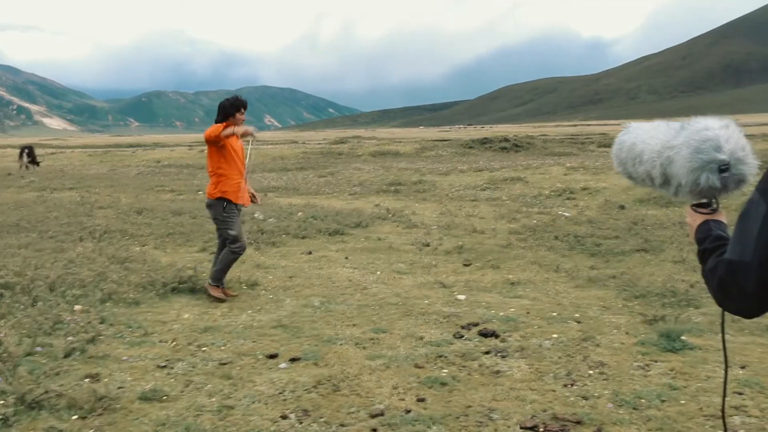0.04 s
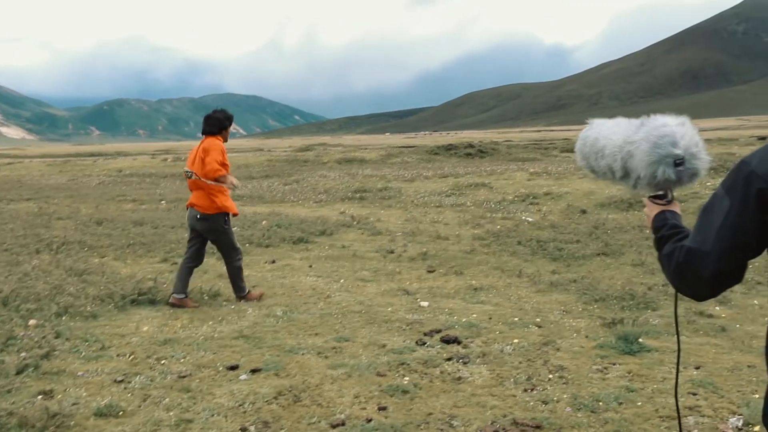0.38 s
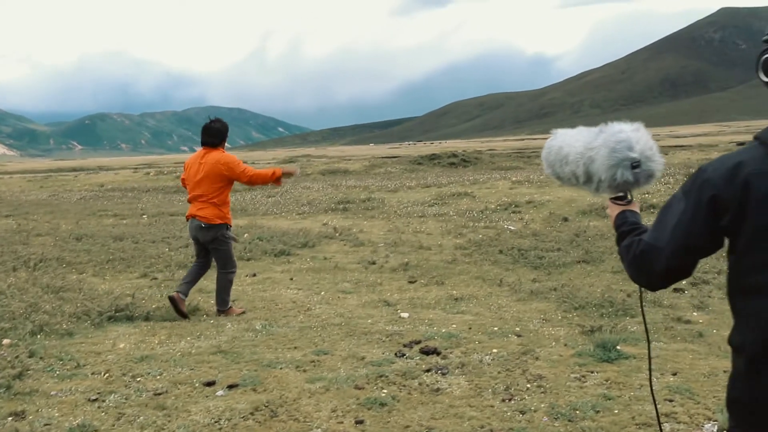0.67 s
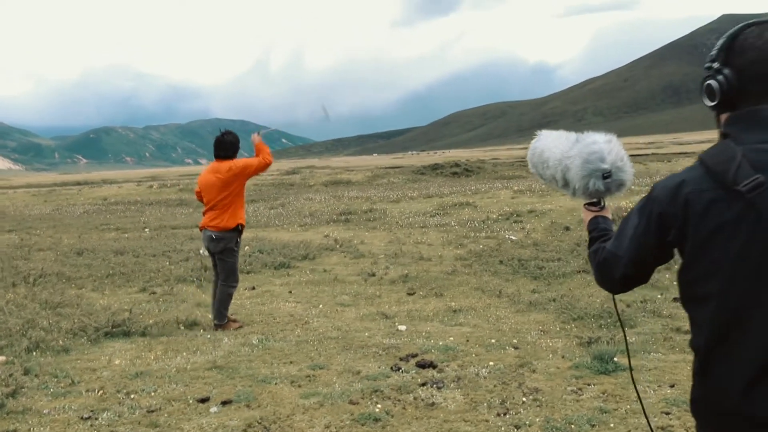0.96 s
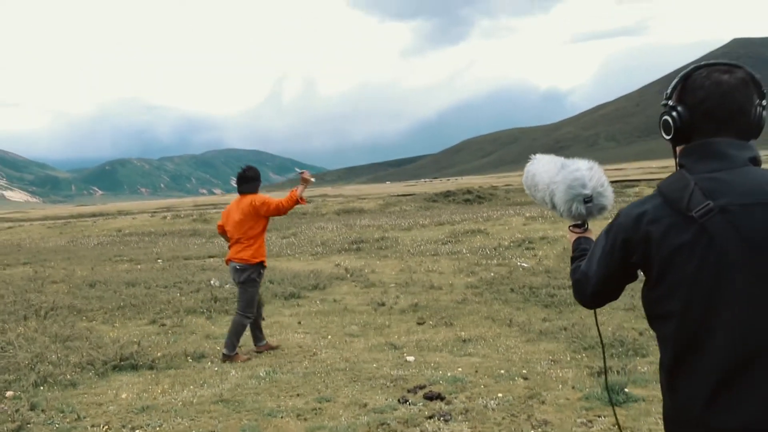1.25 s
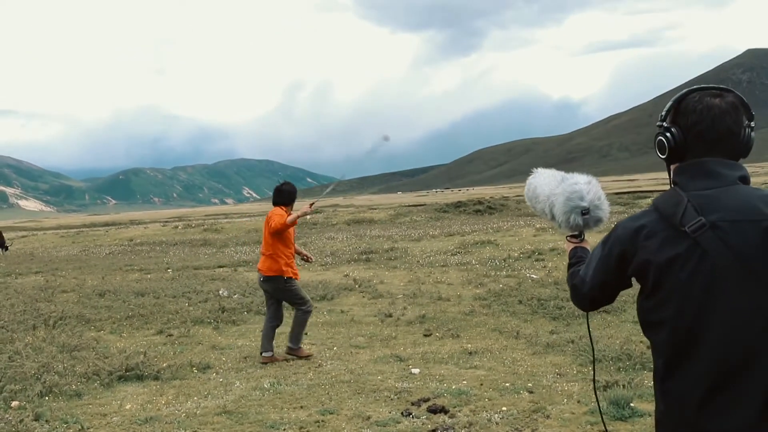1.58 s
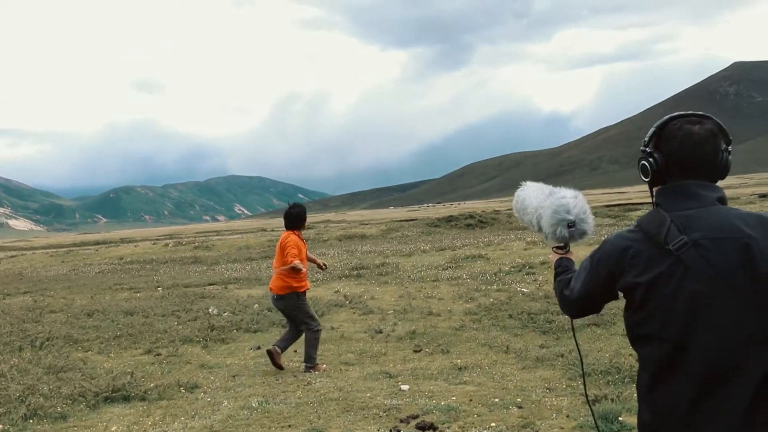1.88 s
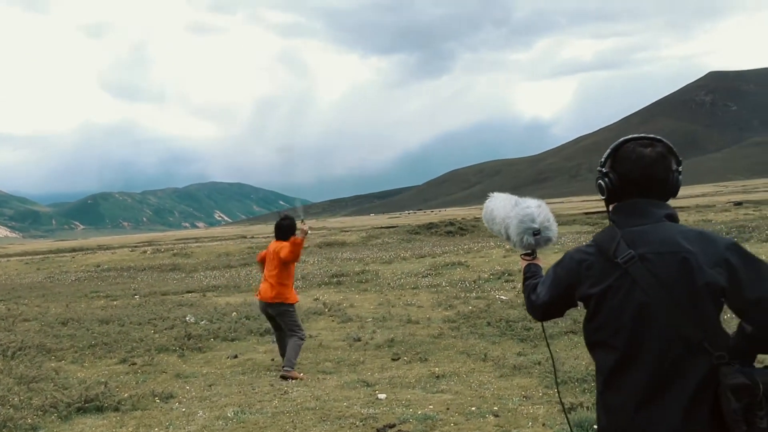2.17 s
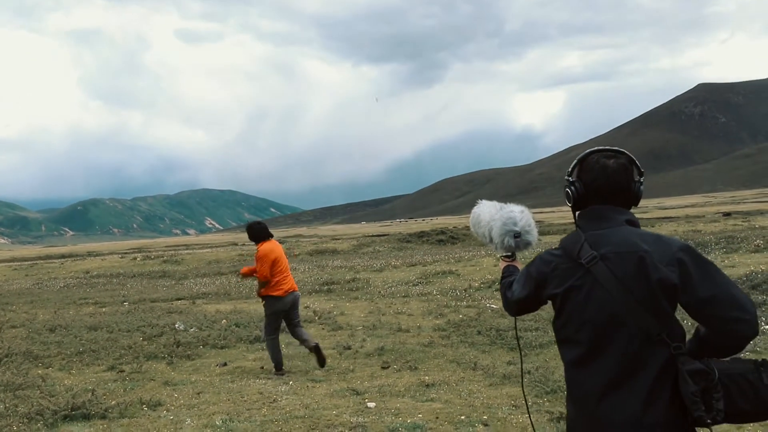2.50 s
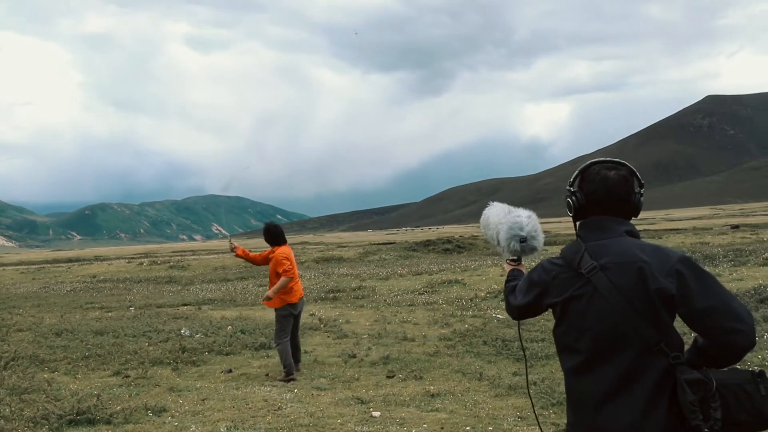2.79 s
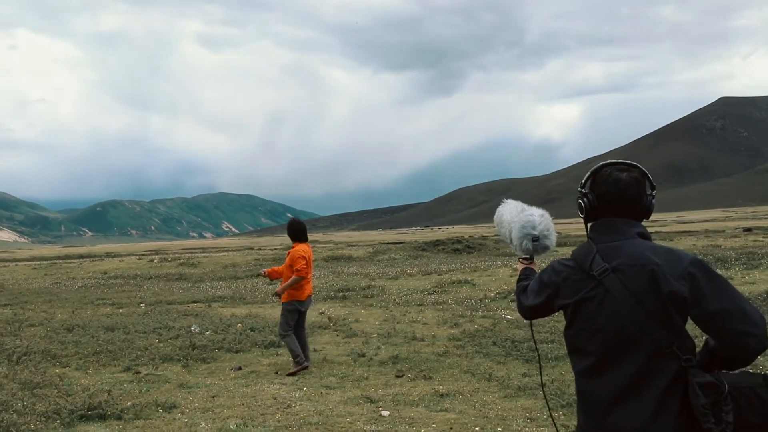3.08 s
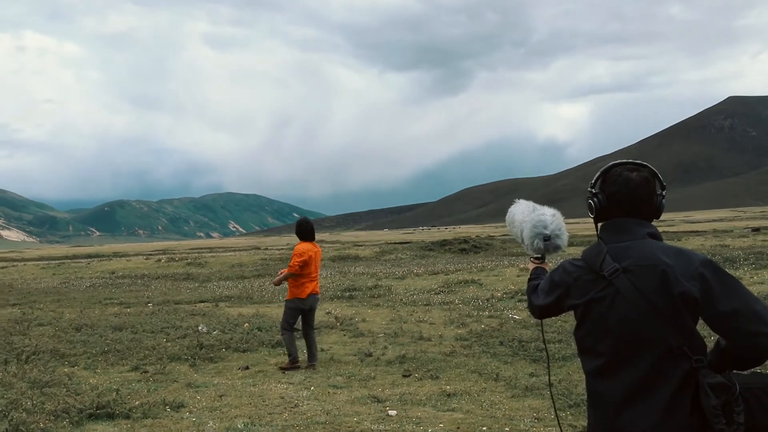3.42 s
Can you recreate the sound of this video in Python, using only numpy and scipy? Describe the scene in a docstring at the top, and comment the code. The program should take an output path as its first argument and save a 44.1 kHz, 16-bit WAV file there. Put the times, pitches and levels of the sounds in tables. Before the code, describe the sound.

A sling whooshes and cracks sharply like a whip, in light outdoor wind.

```python
"""A sling on a grassy plain

A sling is whirled and let fly in light wind; feet and jacket are faintly heard. The cord sheds
vortices and whistles higher as it speeds up. Its tip cracks with a short pressure pulse, and it
flails and slaps as it slows. The ground reflects the crack, the land scatters it, and the spinning
stone whirrs away, fading with distance."""
import sys
import numpy as np
from scipy import signal
from scipy.fft import rfft, irfft
from scipy.io import wavfile
from scipy.ndimage import uniform_filter1d

SR = 44100
rng = np.random.default_rng(int(sys.argv[2]) if len(sys.argv) > 2 else 0)


def materialize(psi):
    """Save the field psi as 16-bit PCM at rate SR to the path in sys.argv[1].

    A 1-D psi becomes a single channel; in a 2-D psi each row is a channel.
    """
    bounded = np.clip(np.atleast_2d(psi).T, -1, 1)
    quanta = np.round(bounded * 32767).astype(np.int16)
    wavfile.write(sys.argv[1], SR, quanta)


N = 160965
T = np.arange(N) / SR


def from_db(db):
    """Amplitude grows tenfold for every 20 dB."""
    return 10 ** (np.asarray(db) / 20)


def unit_rms(x):
    """Division by the RMS amplitude gives unit power."""
    return x / np.sqrt(np.mean(x ** 2) + 1e-20)


def lowpass(x, hz, order=1):
    """A causal Butterworth filter attenuates what lies above its cutoff."""
    return signal.sosfilt(signal.butter(order, min(hz, .45 * SR), fs=SR, output="sos"), x + 1e-18)


def noise(spectrum):
    """Spectral shaping colours white noise; the result has unit power."""
    hz, db = np.transpose(spectrum)
    bin_hz = np.maximum(np.arange(N // 2 + 1) * SR / N, 1)
    gain = from_db(np.interp(np.log(bin_hz), np.log(hz), db))
    return unit_rms(irfft(rfft(rng.standard_normal(N)) * gain, N))


def drift(hz):
    """Low-passed noise gives a random fluctuation of unit power."""
    return unit_rms(lowpass(rng.standard_normal(N + SR), hz, order=2)[SR:])


def swell(centre_s, half_s):
    """A Gaussian envelope falls to 1/e at half_s either side of its centre."""
    return np.exp(-((T - centre_s) / half_s) ** 2)


def decay(start_s, t60):
    """Exponential decay: a sudden onset loses 60 dB in t60 seconds."""
    return (T >= start_s) * np.exp(-np.log(1000) * np.clip((T - start_s) / t60, 0, 10))


def ping(start_s, hz, t60):
    """A struck mode vibrates as a damped sine."""
    return decay(start_s, t60) * np.sin(2 * np.pi * hz * (T - start_s))


def with_ground_echo(direct, db, lag_s=.00222):
    """Ground reflection adds a later, duller copy to the direct sound."""
    return direct + from_db(db) * lowpass(np.interp(T - lag_s, T, direct), hz=3400)


# Strength of the buffeting. Each row: time in seconds, level in dB.
BUFFET_LEVELS = [(0.0, -68), (0.04, -32), (0.35, -33), (0.47, -32), (0.7, -20.5), (1.05, -29), (1.75, -30),
                 (1.92, -21), (2.1, -29), (2.6, -27), (3.0, -33), (3.09, -24), (3.33, -35), (3.65, -33)]
# Spectra of the buffeting and the rush of air. Each row: frequency in Hz, relative density in dB.
BUFFET_SPECTRUM = [(3, -29.5), (8, -5), (11, -1), (17, -11), (29, -23), (40, -24), (50, -36), (80, -51),
                   (200, -70.5), (1000, -110)]
AIR_SPECTRUM = [(40, 1), (130, 2.5), (230, -7), (500, -5), (1000, -12.5), (2000, -20.5), (4000, -26.5),
                (8000, -31.5), (15000, -34.5)]

def wind(air_db=-61, flutter_db=.78):
    """Turbulent pressure buffets the microphone under the soft rush of air over the plain."""
    buffet = noise(BUFFET_SPECTRUM)
    buffet /= np.sqrt(uniform_filter1d(buffet ** 2, size=SR // 5))  # even out the power over 0.2 s
    buffet *= from_db(np.interp(T, *np.transpose(BUFFET_LEVELS)))
    return buffet + from_db(air_db + flutter_db * drift(3.7)) * noise(AIR_SPECTRUM)


# Jacket and grass. Each row: centre in seconds, half length in seconds, level in dB, cutoff in Hz.
RUSTLES = [(.37, 0.064, -65.5, 2980), (0.584, 0.1, -63.5, 4000), (.809, 0.013, -66, 7900),
           (0.955, .08, -65.5, 5000), (1.353, 0.069, -64, 6000), (1.458, .04, -59, 2600),
           (1.757, 0.18, -66, 3520), (1.963, 0.098, -60, 2000), (2.227, 0.033, -55.5, 2600),
           (2.327, 0.068, -52, 3000), (2.965, 0.028, -56, 6000), (3.256, 0.026, -53, 5060)]
# Spectrum of the rubbing. Each row: frequency in Hz, relative density in dB.
RUSTLE_SPECTRUM = [(100, 3), (400, -1.5), (1000, -4), (2500, -12.5), (6000, -18.5), (15000, -30)]

def rustle(grain_db=5.5):
    """Friction of cloth and grass makes grainy noise as the thrower steps and turns."""
    grains = unit_rms(noise(RUSTLE_SPECTRUM) * from_db(grain_db * np.tanh(drift(330))))
    return sum(from_db(db) * lowpass(grains * swell(s, half_s), hz) for s, half_s, db, hz in RUSTLES)


# Snaps of cloth and cord. Each row: start in seconds, level in dB.
TICKS = [(.804, -57), (.816, -55.5), (1.948, -53), (2.211, -50.5), (2.3468, -48), (2.894, -48),
         (2.9453, -47), (2.9752, -47), (3.102, -49.5)]
# Their spectrum. Each row: frequency in Hz, relative density in dB.
TICK_SPECTRUM = [(300, -1), (1200, 0), (3000, -7), (6000, -21), (15000, -42)]

def ticks():
    """Small, dry snaps are transients: broadband noise that decays quickly."""
    return sum(from_db(db) * decay(s, t60=.03) for s, db in TICKS) * noise(TICK_SPECTRUM)


# Footfalls and slaps of the slack cord. Each row: start in seconds, level in dB, pitch in Hz,
# 60 dB decay time in seconds, echo lag in seconds, relative scuff level in dB.
KNOCKS = [(1.6566, -29.5, 275, 0.017, .0022, -12.5), (2.599, -23, 190, .016, .0022, -12),
          (2.676, -10, 580, 0.0039, 0.00152, -14), (2.6825, -13.5, 540, 0.0058, 0.00144, -12),
          (2.721, -15.5, 218, 0.036, .0022, -14.5), (3.377, -42.5, 240, 0.027, 0.0021, -10),
          (3.3852, -17, 484, 0.0017, 0.00085, -12)]
# Spectrum of the scuff. Each row: frequency in Hz, relative density in dB.
SCUFF_SPECTRUM = [(150, 7), (700, 0), (1600, 1), (4000, -12), (8000, -28), (15000, -38)]

def knocks(echo_db=-7):
    """Each impact excites a heavily damped mode and a scuff, and the ground reflects both."""
    grit, blows = noise(SCUFF_SPECTRUM), 0
    for s, db, hz, t60, lag_s, scuff_db in KNOCKS:
        scuff = from_db(scuff_db) * grit * decay(s, 2 * t60)
        blow = lowpass(scuff - ping(s, hz, t60), 5 * hz, order=2)
        blows += from_db(db) * with_ground_echo(blow, echo_db, lag_s)
    return blows


CRACK_S = 2.58705  # the scatter, the stone's flight and the tip's whistle are timed from the crack
# Scatter from nearby grass and far slopes. Each row: frequency in Hz, relative density in dB.
NEAR_SPECTRUM = [(80, -16.5), (380, 4), (700, -5), (1600, -3.5), (3500, -15), (7000, -13.5), (11000, -25),
                 (16000, -34)]
FAR_SPECTRUM = [(60, -10), (170, 3), (380, -9), (600, -10), (800, -14), (1800, -16.5), (4000, -27.5),
                (8000, -38), (16000, -53)]

def land_scatter(near_db=-27, far_db=-42.7):
    """Diffuse scattering returns the crack as a short tail of noise and a long, wavering one."""
    near = from_db(near_db) * decay(CRACK_S, t60=.28) * noise(NEAR_SPECTRUM)
    far = from_db(far_db + 1.7 * drift(17)) * decay(CRACK_S, t60=3.04) * noise(FAR_SPECTRUM)
    return near + far


# Bands of the stone's puffs. Each row: centre in Hz, width in Hz, relative level in dB.
PUFF_BANDS = [(306, 131, -1), (555, 110, -12)]

def stone(spin_hz=26.6, sag_hz_per_s=.8, jitter_s=.0007, level_db=-55, fading_db_per_s=1.6):
    """Two faces of the stone each shed a puff per turn; spherical spreading weakens the whirr."""
    flight_s = np.maximum(T - CRACK_S, 0)
    turns = np.cumsum((flight_s > 0) * (spin_hz - sag_hz_per_s * flight_s)) / SR
    turns += spin_hz * jitter_s * flight_s * drift(25)
    # Each face gives one impulse at its own fraction of the turn.
    first, second = [np.diff(np.floor(turns - lag), prepend=0).clip(0, 1) for lag in (.42, .718)]
    whirr = 0
    for hz, width_hz, db in PUFF_BANDS:
        puffs = (first + from_db(-1.5) * second) * (1 + .2 * rng.standard_normal(N))
        bandpass = signal.butter(2, [hz - width_hz / 2, hz + width_hz / 2], "band", fs=SR, output="sos")
        band = signal.sosfilt(bandpass, puffs + 1e-18)
        whirr += from_db(db) * band / band[flight_s > 0].std()
    fading_db = fading_db_per_s * flight_s * drift(9.8)  # the air makes it more uneven with distance
    distance = np.hypot(flight_s, .16)  # in seconds of flight
    return from_db(level_db + fading_db) * whirr / distance


# Spectrum of the whoosh. Each row: frequency in Hz, relative density in dB.
WHOOSH_SPECTRUM = [(50, -5), (170, 7.5), (400, 3.5), (900, -9), (3000, -45.5)]

def follow_through():
    """Air displaced by the follow-through makes one low swell of noise."""
    return from_db(-33.5) * swell(2.725, half_s=.055) * noise(WHOOSH_SPECTRUM)


# Passes of the cord's tuft. Each row: centre in seconds, half length in seconds, level in dB.
WHISKS = [(0.946, 0.51, -76), (1.556, 0.022, -66), (1.616, 0.014, -67), (2.573, 0.057, -46.5),
          (2.638, .012, -51), (2.724, 0.005, -37.5), (2.731, 0.017, -44.5), (2.797, 0.032, -49),
          (2.85, 0.035, -65)]
# Their spectrum. Each row: frequency in Hz, relative density in dB.
WHISK_SPECTRUM = [(1000, 3), (3800, -1.5), (5800, -4.5), (8000, -7.5), (11000, -17), (16000, -16.5)]

def tuft():
    """Flow noise rises and falls as the tuft whisks through the air."""
    return sum(from_db(db) * swell(s, half_s) for s, half_s, db in WHISKS) * noise(WHISK_SPECTRUM)


def whistle(hz, steady_cycles=5):
    """Vortex shedding gives an aeolian tone, whose strength and phase hold for only a few cycles."""
    cycles = np.cumsum(hz) / SR
    knots = rng.standard_normal((2, N // 4))
    wander = np.interp(cycles / steady_cycles, np.arange(N // 4), knots[0] + 1j * knots[1])
    evened = wander / np.sqrt(np.abs(wander))
    return np.sqrt(2) * np.real(evened * np.exp(2j * np.pi * cycles))


def stroke(path, origin_s):
    """An aeolian tone follows a path of pitch and level; returns the tone and its envelope."""
    s, hz, db = np.transpose(path)
    envelope = from_db(np.interp(T - origin_s, s, db, left=-200, right=-200))
    return envelope * whistle(np.interp(T - origin_s, s, hz), steady_cycles=2.5), envelope


# The cord's whistle through the throw. Each row: time in seconds, pitch in Hz, level in dB.
THROW_PATH = [(2.41, 250.2, -63), (2.455, 309, -45), (2.48, 490, -45.5), (2.515, 644, -38),
              (2.543, 601, -49.5), (2.562, 451.6, -39), (2.58, 395, -31), (2.595, 400, -57.5)]
# The tip's whistle. Each row: time from the crack in seconds, pitch in Hz, level in dB.
TIP_PATH = [(-.011, 601, -60), (-.007, 703, -39), (-.004, 1456, -24), (-.0005, 4295, -21),
            (.002, 3710, -25.5), (.007, 3580, -28), (.011, 2802, -31), (.018, 2300, -33.5),
            (.027, 1441, -31.5), (.043, 960, -40), (.075, 774, -44.5)]
# Other swings, and at 2.211 s a low, short footfall voiced the same way. Each row: centre in seconds, # half
# length in seconds, pitch in Hz, glide in octaves per second, level in dB.
SWINGS = [(0.626, 0.045, 564, 4.5, -59.5), (.795, 0.024, 427, 7.5, -60), (1.086, 0.033, 720, 1, -67),
          (2.188, .019, 290, -12.5, -42.5), (2.211, .012, 180, -5, -46), (2.207, 0.022, 899, -0.5, -62),
          (2.31, .054, 362, 1, -57), (2.707, .016, 1020, 12.5, -37.5), (2.735, .016, 598, 2.5, -39),
          (2.764, .013, 844, 10, -40.5), (2.78, .004, 1400, 20.5, -31), (2.784, .0055, 1667, 10.5, -26),
          (2.795, 0.0045, 1930, 11, -34.5), (2.85, 0.025, 938, -3.5, -46.5)]
# Turbulence beside the whistle. Each row: frequency in Hz, relative density in dB.
HISS_SPECTRUM = [(150, 7.5), (600, 4), (1800, -2.5), (4000, -22.5), (9000, -34), (16000, -40)]

def cord(hiss_db=-6.5):
    """A cord's aeolian pitch is proportional to its speed; turbulent hiss swells with the tone."""
    strokes = [stroke(THROW_PATH, 0), stroke(TIP_PATH, CRACK_S)]
    for s, half_s, hz, glide, db in SWINGS:
        envelope = from_db(db) * swell(s, half_s)
        octaves = glide * np.clip(T - s, -2 * half_s, 2 * half_s)
        strokes.append((envelope * whistle(hz * 2 ** octaves), envelope))
    tone, envelope = np.sum(strokes, axis=0)
    return with_ground_echo(tone, db=-18) + from_db(hiss_db) * envelope * noise(HISS_SPECTRUM)


def release():
    """The loop snaps off the finger with a high, strongly damped ring, which the ground reflects."""
    return with_ground_echo(from_db(-5.5) * ping(2.5688, hz=8440, t60=.00088), db=-1.5)


# Crackle of the frayed tip. Each row: frequency in Hz, relative density in dB.
FRAY_SPECTRUM = [(300, -2.5), (1500, -2.5), (3600, -0.5), (6000, -5), (11000, -7.5), (16000, -23)]

def crack(push_s=.00038, pull_s=.00036):
    """The tip radiates a shock, a short compression then a deeper rarefaction, wrapped in crackle."""
    t = T - CRACK_S
    compression = .42 * ((t > -push_s) & (t < 0))
    rarefaction = (t >= 0) * np.exp(-np.abs(t) / pull_s)
    shock = from_db(-.3) * lowpass(compression - rarefaction, hz=7500)
    thump = from_db(-19.5) * ping(CRACK_S, hz=385, t60=.019)
    tip_ring = from_db(-18) * ping(CRACK_S, hz=2110, t60=.0035)
    fray_envelope = np.maximum(swell(CRACK_S, half_s=.0019), decay(CRACK_S, t60=.043))
    crackle = from_db(-20) * fray_envelope * noise(FRAY_SPECTRUM)
    return with_ground_echo(shock - thump - tip_ring + crackle, db=-1.5)


def scene():
    """By superposition, the pressures of all sources add at one microphone."""
    sling = cord() + tuft() + follow_through() + release() + crack()
    return (sling + land_scatter() + stone() + knocks() + ticks() + rustle() + wind())[None]


def record(dry, cutoff_hz=15900):
    """Clipping limits the signal to full scale, then a steep low-pass limits its bandwidth."""
    return signal.sosfilt(signal.ellip(10, .1, 80, cutoff_hz, fs=SR, output="sos"), np.clip(dry, -1, 1))


dry = scene()
out = record(dry)
materialize(out)
```